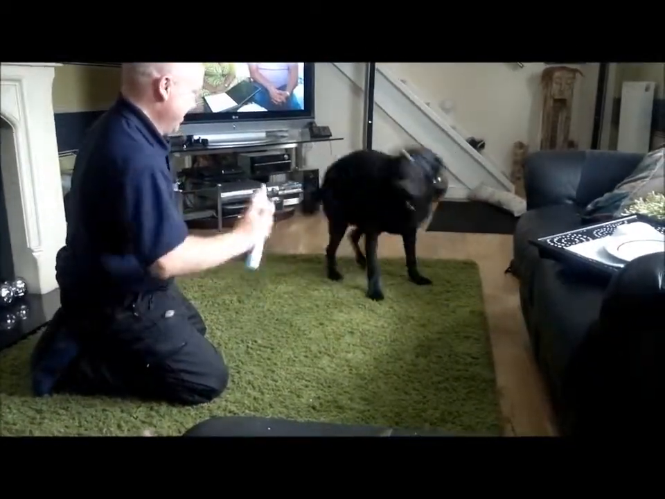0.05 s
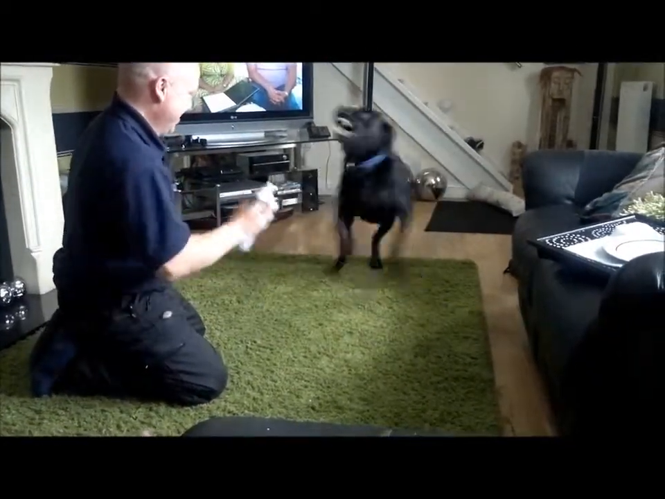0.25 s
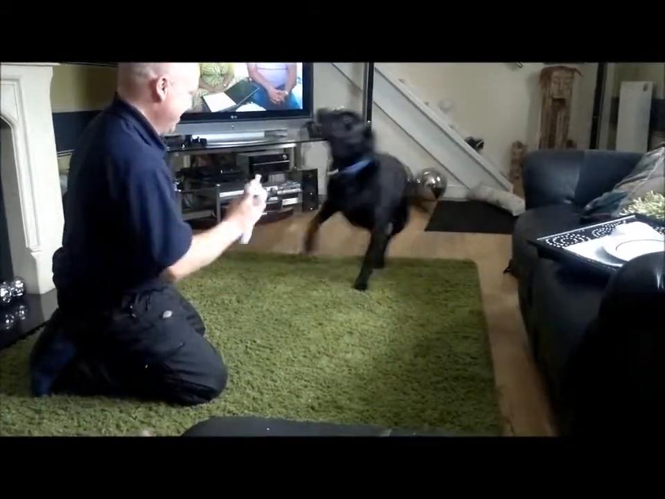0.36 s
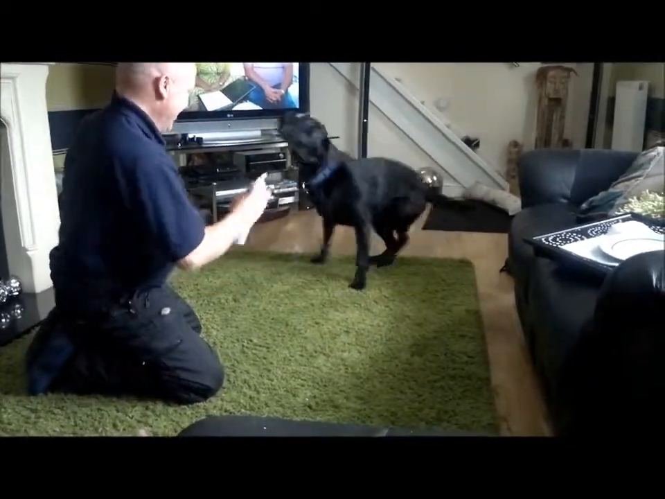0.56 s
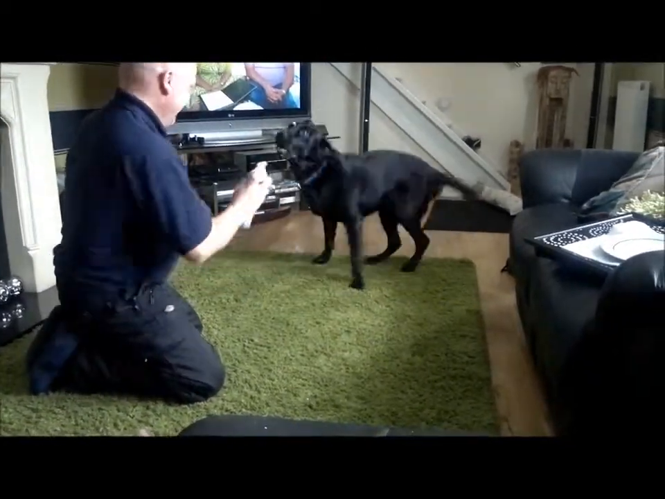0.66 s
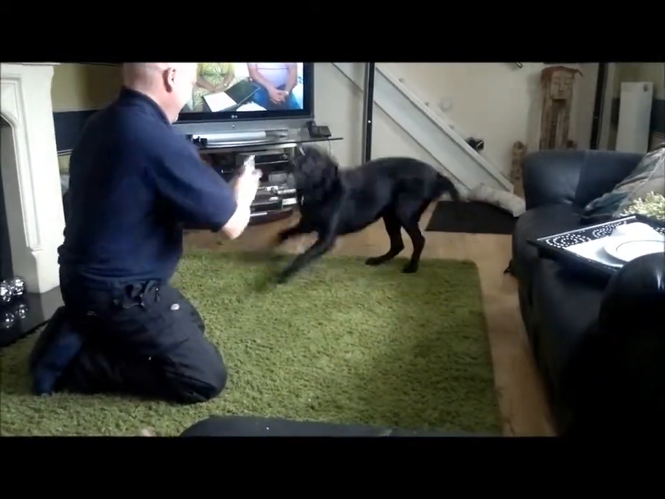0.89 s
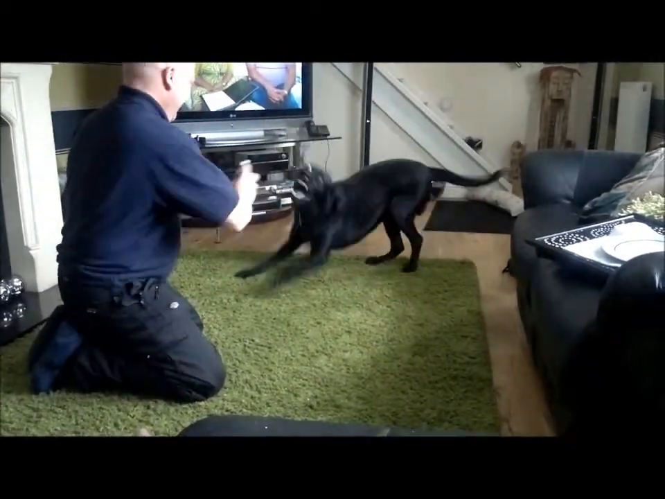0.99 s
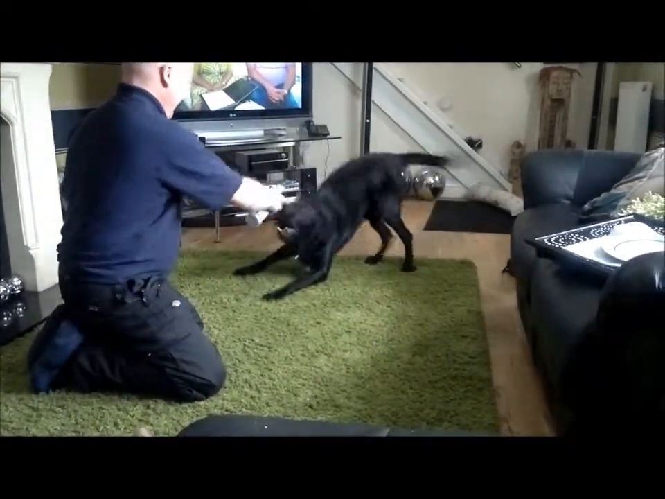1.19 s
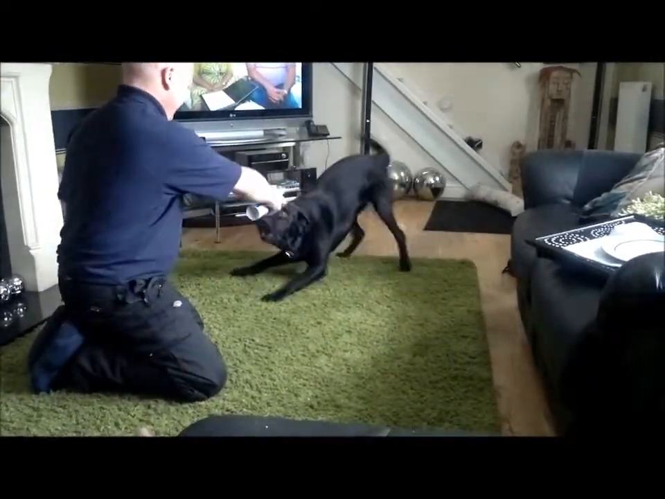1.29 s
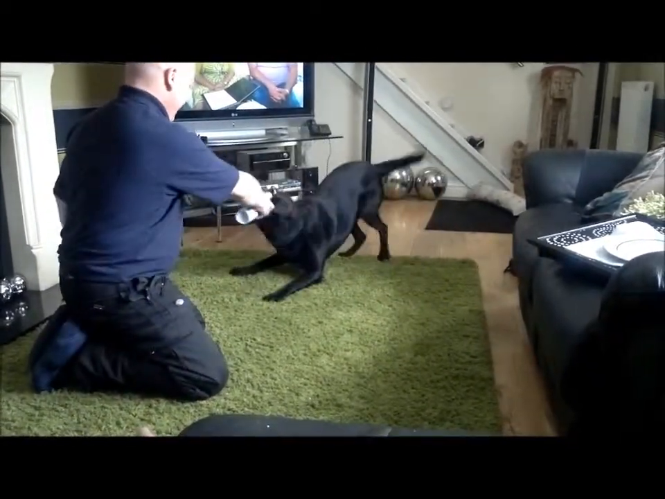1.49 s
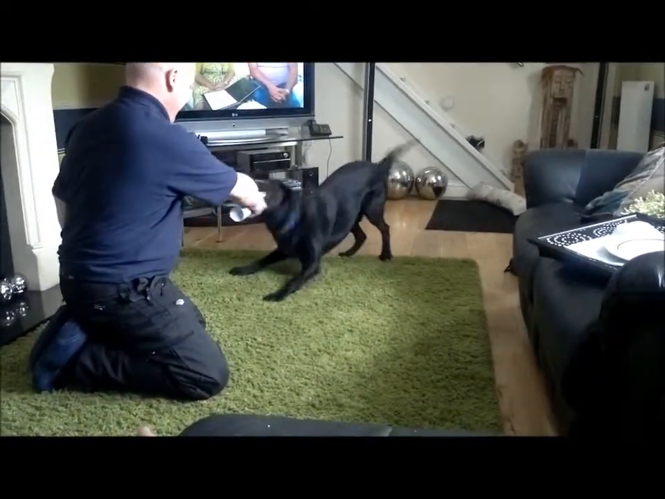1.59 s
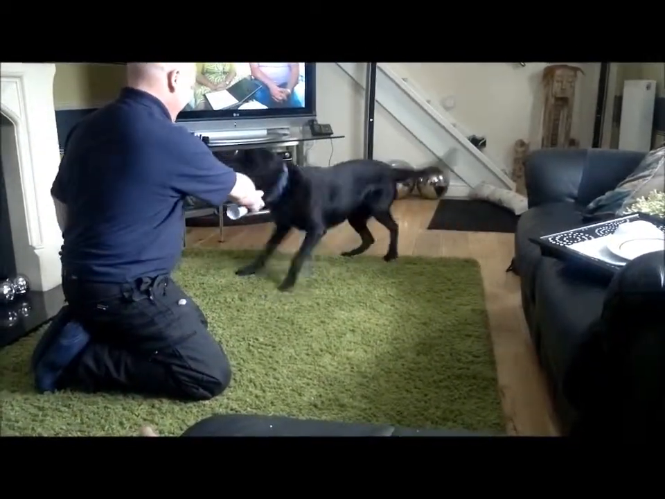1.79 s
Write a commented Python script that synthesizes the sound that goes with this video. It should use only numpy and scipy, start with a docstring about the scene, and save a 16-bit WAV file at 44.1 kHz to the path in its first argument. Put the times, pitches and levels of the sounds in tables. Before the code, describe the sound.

A big dog barks twice, loud and hoarse, in a living room with short ringing echoes

```python
"""Large dog barking indoors

Two barks in a carpeted living room: a hoarse low growl breaks into a clear note, sags roughly and rings on.
Voice is harmonics through throat resonances, with halfway tones when rough and rasp puffed once a cycle.
Filtered noise makes the breaths before the barks, claw or collar ticks, scuffs and short hisses.
Low thuds are decaying sines plus rumble; decaying noise makes the room's echoes; a limiter holds the peaks."""
import sys
import numpy as np
from scipy import signal
from scipy.fft import rfft, irfft, next_fast_len
from scipy.io import wavfile
from scipy.ndimage import uniform_filter1d, minimum_filter1d, map_coordinates

SR = 44100
rng = np.random.default_rng(int(sys.argv[2]) if len(sys.argv) > 2 else 0)


def put_to_file(sound):
    """Save the sound as 16-bit audio at rate SR, in the file named by the first command-line argument."""
    columns = np.atleast_2d(sound).T  # one column per channel
    safe = np.clip(columns, -1, 1)
    whole_steps = np.round(safe * 32767)
    wavfile.write(sys.argv[1], SR, whole_steps.astype(np.int16))


N = 81585

# background noise spectrum: freq_hz, density_db_per_hz
ROOM_TONE_SPECTRUM = [(25, -4), (120, -6), (500, 1.5), (2000, -14.5), (6000, -35.5), (15000, -71)]
ROOM_TONE_DB = -72

# low thuds and bumps, many perhaps paws, with a faint rumble at the start: start_s, level_db, pitch_hz, t60_s
LOW_THUDS = [(0, -55.5, 52.8, 1), (0.213, -24.5, 89, 0.18), (0.222, -16, 54, 0.15), (0.311, -26, 65, 0.24),
             (0.844, -31, 78.7, 0.41), (0.989, -29.5, 55.2, 0.17), (1.081, -26.5, 62.6, 0.061),
             (1.168, -44, 61.7, 0.45), (1.489, -39, 238, 0.046), (1.6, -50.5, 59, 0.43),
             (1.731, -35.5, 101, 0.096), (1.752, -35.5, 59.2, 0.12)]
# floor rumble spectrum: freq_hz, density_db_per_hz
FLOOR_SPECTRUM = [(20, -8), (55, -10), (100, -4.5), (165, -11), (280, -19), (600, -33.5), (2000, -81.5),
                  (6000, -130)]
THUD_RISE_S, THUD_NOISE_DB = 0.0075, 0.5  # noise relative to tone

# short hisses: start_s, level_db, hold_s, t60_s
SHORT_HISSES = [(0, -63.5, 0.017, 0.24), (1.436, -51.5, 0.036, 1), (1.599, -43, 0.031, 0.56),
                (1.761, -43.5, 0.04, 0.36)]
# hiss spectrum: freq_hz, density_db_per_hz
HISS_SPECTRUM = [(300, -12.5), (2400, -8.5), (3300, 2), (4200, 4), (6000, -4), (8500, -14.5), (11500, -22),
                 (15000, -33.5)]

# breaths drawn: peak_s, rise_s, fall_s, level_db
BREATHS = [(0.122, 0.21, 0.42, -41.5), (0.829, 0.077, 0.087, -46)]
# one spectrum per breath: freq_hz, density_db_per_hz
BREATH_SPECTRA = [
    [(150, -15.5), (390, 2), (850, -8.5), (1800, -6), (2900, -23), (3700, -24), (5200, -38.5), (14000, -36)],
    [(150, -29.5), (450, 5), (1200, -1.5), (2000, 3.5), (2900, -6.5), (4100, -0.5), (5000, -16),
     (7800, -16.5), (10000, -35), (14000, -42)],
]

# small clicks: start_s, level_db
CLICKS = [(0.155, -56), (1.522, -52.5)]
# click spectrum: freq_hz, density_db_per_hz
CLICK_SPECTRUM = [(2000, -49.5), (7000, -10), (11000, -16), (15000, -28.5)]
CLICK_T60_S = 0.068

# one contour per bark: time_s, pitch_hz, voice_db, brightness_db, rasp_db, roughness (0-1)
BARK_CONTOURS = [
    [(.232, 248, -30.5, 0.5, -39.5, 0.43), (.248, 256.3, -12, -28, -19.5, 0.42),
     (.268, 276.4, -0.5, -10.5, -29.5, 0.1), (.281, 292.3, -12.5, -3.5, -16, 0.31),
     (.297, 306.5, -1.5, -1, -17, 0.26), (.304, 488.9, -11, -2.5, -15.5, 0.19),
     (.336, 505.9, -10.5, -3.5, -17, 0.45), (.356, 488.6, -7.5, -5, -25, 0.13),
     (.374, 475.6, -14, -2, -20, 0.41), (.392, 411.8, -19, -10.5, -37.5, 0.33),
     (.418, 331.4, -21, -9, -46.5, 0.8)],
    [(.938, 289.2, -26.5, -17.5, -53, 0.55), (.953, 378.6, -17.5, -6, -39.5, 0.99),
     (.969, 402.5, -15.5, 4.5, -27.5, 0.52), (.982, 430.6, -20, 8.5, -14.5, 0.11),
     (1.001, 482.9, -16, 8, -35, 0.2), (1.026, 505.4, -12.5, -6.5, -36.5, 0.27),
     (1.05, 522.4, -25.5, 9, -33, 0.07), (1.072, 510.2, -20, 3.5, -28.5, 0.11),
     (1.087, 435, -14, -4.5, -31.5, 0.26), (1.102, 391, -20.5, 0, -55, 0.3),
     (1.128, 332.8, -12, -25.5, -44, 0.37)],
]
# throat resonances on the voice: freq_hz, gain_db
THROAT_RESPONSE = [(220, -31.5), (300, -20.5), (390, -5.5), (510, -1.5), (700, -28.5), (800, -13.5),
                   (1000, -4), (1220, -17.5), (1520, -11), (1850, -12.5), (2150, -10.5), (2750, -38),
                   (4200, -39.5), (5900, -42), (7500, -54), (15000, -66.5)]
# share of the brightness passed as the jaws open: freq_hz, share
JAW_OPENING = [(550, 0.014), (950, 0.7), (1700, 1.28), (5000, 1.96)]
# rasp spectrum: freq_hz, density_db_per_hz
RASP_SPECTRUM = [(170, -39), (300, -5), (410, 5.5), (540, 10), (760, 1), (1150, 7), (1700, 10),
                 (2250, -3.5), (2800, -4), (4200, -7), (6100, -14), (7400, -28), (11000, -28), (15000, -46)]
JITTER_RATIO, SHIMMER_DB, WOBBLE_KNOTS_PER_S = 0.039, 6, 420  # depths at full roughness
SUBTONE_GAIN = 0.8  # halfway tones at full roughness
BARK_EDGE_S, MOUTH_CUT_HZ = 0.00093, 220  # the mouth radiates little below the cut

# decay of the room tail: freq_hz, t60_s
TAIL_T60 = [(120, 0.85), (450, 0.54), (1000, 0.51), (2200, 0.5), (5500, 0.47), (12000, 0.33)]
# echo spectrum: freq_hz, level_db
ECHO_SPECTRUM = [(100, -9), (300, -3.5), (500, 1.5), (1000, 6.5), (2200, -3), (6000, 9), (14000, 1)]
# notes the room holds on to: freq_hz, level_db, t60_s
RINGING_MODES = [(409.3, -59, 0.38), (486.5, -59, 0.45), (986, -68, 0.29), (1036.6, -60.5, 0.72),
                 (1490, -59, 0.61), (2074, -65, 0.64)]
TAIL_DB, EARLY_DB, EARLY_T60_S, ECHO_RISE_S = -1.5, -3, 0.093, 0.00054
HEAD_SWING_HZ = 2.532  # rate at which the moving head changes the echo paths

# scuffs and bumps of the lunge: start_s, level_db, hold_s, t60_s
LUNGE_SCUFFS = [(1.496, -41.5, 0.0029, 0.22), (1.53, -53, 0.04, 0.22), (1.572, -49.5, 0.0043, 0.93),
                (1.644, -40, 0.0055, 0.22), (1.7, -54, 0.022, 0.3)]
# scuff spectrum: freq_hz, density_db_per_hz
SCUFF_SPECTRUM = [(80, -9.5), (250, 1.5), (500, 3), (800, -6.5), (1100, 0.5), (1500, -8), (2050, -3.5),
                  (2700, -10), (5000, -15.5), (12000, -38.5)]

# left-right likeness of diffuse noise: freq_hz, correlation
STEREO_LIKENESS = [(100, 0.92), (500, 0.94), (1000, 0.79), (2000, 0), (6000, 0)]
# left minus right level: freq_hz, difference_db
STEREO_BALANCE = [(60, -4.5), (400, -4.5), (700, -4), (1300, -0.5), (2400, -0.5), (8000, -1.5)]
LEFT_LEAD_S = 0.00016
CEILING_DB, LIMIT_HOLD_S, TOP_HZ = -0.2, 0.0031, 15600


def amp(db):
    """Decibels to gain."""
    return 10 ** (np.asarray(db) / 20)


def unit(x):
    """Scale to rms 1."""
    return x / np.sqrt(np.mean(x ** 2) + 1e-20)


def along(points, hz):
    """Interpolate (freq_hz, value) points on a log frequency axis."""
    freq_hz, value = np.transpose(points)
    return np.interp(np.log(hz + 1), np.log(freq_hz + 1), value)


def clock():
    """Time of each sample in seconds."""
    return np.arange(N) / SR


def fade(t, t60_s):
    """Exponential decay from t = 0, down 60 dB after t60_s."""
    return np.exp(-np.log(1000) * np.maximum(t, 0) / t60_s)


def wobble(knots_per_s):
    """Smooth random curve through normally distributed knots."""
    knots = rng.standard_normal(N // 8)
    return map_coordinates(knots, [clock() * knots_per_s], mode="wrap")


def filtered(x, response):
    """Multiply the spectrum of x by a response of frequency."""
    size = next_fast_len(N + SR // 2)
    hz = np.fft.rfftfreq(size, 1 / SR)
    return irfft(rfft(x, size) * response(hz), size)[..., :N]


def diffuse(spectrum):
    """Coloured stereo noise of rms 1; the mid-side mix sets left-right likeness per frequency."""
    def mid_side_gain(hz):
        angle = np.arccos(np.clip(along(STEREO_LIKENESS, hz), -1, 1)) / 2
        return amp(along(spectrum, hz)) * [np.cos(angle), np.sin(angle)]

    mid, side = filtered(rng.standard_normal((2, N)), mid_side_gain)
    return unit(np.array([mid + side, mid - side]))


def rubs(events, spectrum, grain_db, rise_s):
    """Grainy noise bursts: linear attack, exponential release after the hold."""
    t = clock()
    level = np.zeros(N)
    for start_s, level_db, hold_s, t60_s in events:
        attack = np.clip((t - start_s) / rise_s, 0, 1)
        level += amp(level_db) * attack * fade(t - start_s - hold_s, t60_s)
    grain = amp(grain_db * wobble(480))
    return level * unit(diffuse(spectrum) * grain)


def room_tone():
    """Steady diffuse background noise."""
    return amp(ROOM_TONE_DB) * diffuse(ROOM_TONE_SPECTRUM)


def thuds():
    """Low thuds and bumps, many perhaps paws, after a faint opening rumble: decaying sines plus noise."""
    out = np.zeros((2, N))
    rumble = amp(THUD_NOISE_DB) * diffuse(FLOOR_SPECTRUM)
    for start_s, level_db, pitch_hz, t60_s in LOW_THUDS:
        t = np.maximum(clock() - start_s, 0)
        envelope = (1 - np.exp(-t / THUD_RISE_S)) * fade(t, t60_s)
        boom = np.sqrt(2) * np.sin(2 * np.pi * pitch_hz * t)
        out += amp(level_db) * envelope * (boom + rumble)
    return out


def hisses():
    """Short hisses, the later ones perhaps from a spray can: turbulent noise."""
    return rubs(SHORT_HISSES, HISS_SPECTRUM, grain_db=1.0, rise_s=0.0073)


def gasps():
    """Air drawn through the open mouth: noise that swells and fades."""
    out = np.zeros((2, N))
    for (peak_s, rise_s, fall_s, level_db), spectrum in zip(BREATHS, BREATH_SPECTRA):
        t = clock() - peak_s
        swell = np.exp(-(t / np.where(t < 0, rise_s, fall_s)) ** 2)
        out += amp(level_db + 0.8 * wobble(53.1)) * swell * diffuse(spectrum)
    return out


def ticks():
    """Tiny bright clicks, as of a collar or a claw: noise with instant onset and decay."""
    t = clock()
    level = sum(amp(level_db) * (t >= start_s) * fade(t - start_s, CLICK_T60_S)
                for start_s, level_db in CLICKS)
    return level * diffuse(CLICK_SPECTRUM)


def bark(contour, count=30):
    """Vocal folds sound through the throat; roughness adds jitter, shimmer and halfway tones."""
    t = clock()
    time_s, *columns = np.transpose(contour)
    pitch_hz, voice_db, bright_db, rasp_db, rough = [np.interp(t, time_s, c) for c in columns]
    rough = np.clip(rough, 0, 1)
    jitter = 1 + JITTER_RATIO * rough * wobble(WOBBLE_KNOTS_PER_S)
    phase = 2 * np.pi * np.cumsum(pitch_hz * jitter) / SR

    def partial(k):
        hz = k * pitch_hz
        level_db = along(THROAT_RESPONSE, hz) + bright_db * along(JAW_OPENING, hz)
        return amp(level_db) * np.cos(k * phase + rng.uniform(0, 2 * np.pi))

    voice = sum(partial(k) for k in range(1, count))
    voice += SUBTONE_GAIN * rough * sum(partial(k + 0.5) for k in range(1, count // 2))
    voice *= amp(voice_db + SHIMMER_DB * rough * wobble(WOBBLE_KNOTS_PER_S))

    puffs = rng.standard_normal(N) * (1 + np.cos(phase))  # one puff a cycle
    rasp = amp(rasp_db) * unit(filtered(puffs, lambda hz: amp(along(RASP_SPECTRUM, hz))))

    inside_s = np.minimum(t - time_s[0], time_s[-1] - t)
    gate = np.clip(inside_s / BARK_EDGE_S + 1, 0, 1)  # ramps lie just outside the contour
    call = (np.sqrt(2) * voice + rasp) * gate
    return filtered(call, lambda hz: hz ** 8 / (hz ** 8 + MOUTH_CUT_HZ ** 8))


def room(x):
    """Echoes: early ones off nearby furniture, and a tail decaying at its own speed per band."""
    t = clock()
    hz, frame_s, bands = signal.stft(diffuse(ECHO_SPECTRUM), SR, nperseg=256)
    decay = fade(frame_s, along(TAIL_T60, hz)[:, None])
    tail = signal.istft(bands * decay, SR, nperseg=256)[1][:, :N]
    early = diffuse(ECHO_SPECTRUM) * fade(t, EARLY_T60_S)
    answer = (amp(TAIL_DB) * unit(tail) + amp(EARLY_DB) * unit(early)) / np.sqrt(N)
    answer = answer * np.clip(t / ECHO_RISE_S, 0, 1)
    return signal.fftconvolve(x[None], answer, axes=1)[:, :N]


def in_room(x):
    """Direct sound, echoes that shift as the head swings, and room modes that ring on."""
    t = clock()
    swing = 2 * np.pi * HEAD_SWING_HZ * t
    echoes = room(x * np.cos(swing)) + room(x * np.sin(swing))  # two independent sets of paths
    modes = sum(amp(level_db) * fade(t, t60_s) * np.cos(2 * np.pi * freq_hz * t)
                for freq_hz, level_db, t60_s in RINGING_MODES)
    return x + echoes + signal.fftconvolve(x, modes)[:N]


def scuffs():
    """Scuffs and bumps of the lunge: friction noise with a sharp onset."""
    return rubs(LUNGE_SCUFFS, SCUFF_SPECTRUM, grain_db=1.0, rise_s=0.0024)


def scene():
    """Mix all layers; the left microphone hears first, the right one has more bass."""
    sound = room_tone() + thuds() + hisses() + gasps() + ticks() + scuffs()
    sound += sum(in_room(bark(contour)) for contour in BARK_CONTOURS)
    sides = np.array([[0.5], [-0.5]])  # left, right

    def stereo_response(hz):
        gain = amp(sides * along(STEREO_BALANCE, hz))
        return gain * np.exp(2j * np.pi * hz * LEFT_LEAD_S * sides)

    return filtered(sound, stereo_response)


def record(dry):
    """Camera limiter: hold the lowest needed gain, smooth it, then cut all above the band limit."""
    size = int(LIMIT_HOLD_S * SR)
    peak = np.abs(dry).max(axis=0)
    needed = np.minimum(1, amp(CEILING_DB) / (peak + 1e-9))
    gain = uniform_filter1d(minimum_filter1d(needed, size), size)
    return filtered(dry * gain, lambda hz: hz < TOP_HZ)


dry = scene()
out = record(dry)
put_to_file(out)
```